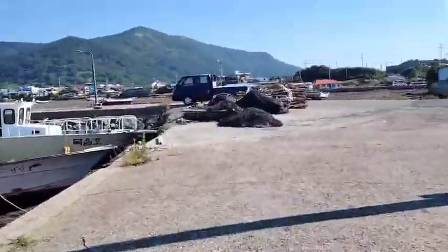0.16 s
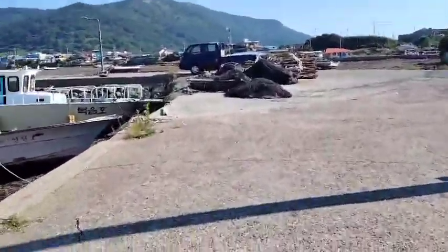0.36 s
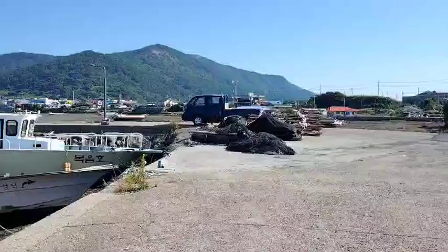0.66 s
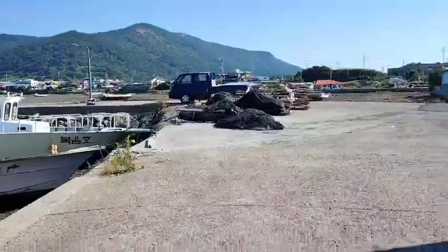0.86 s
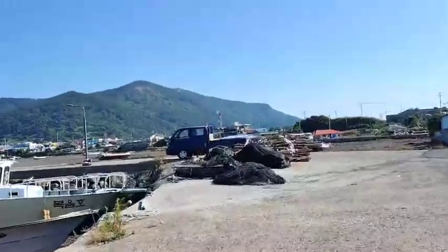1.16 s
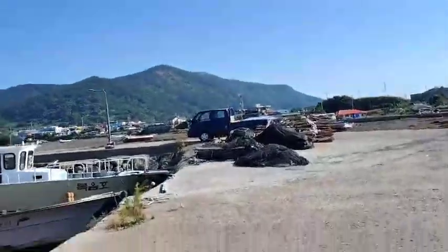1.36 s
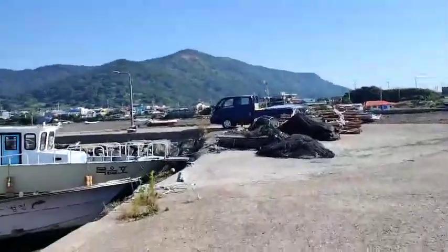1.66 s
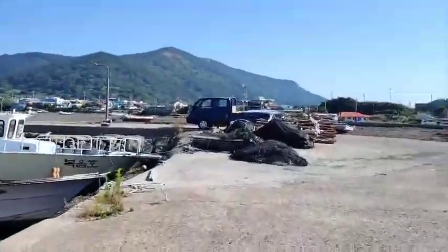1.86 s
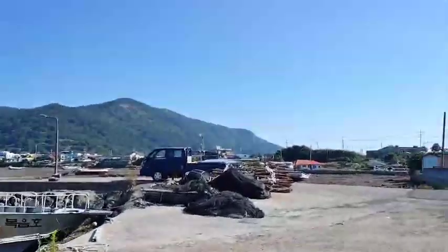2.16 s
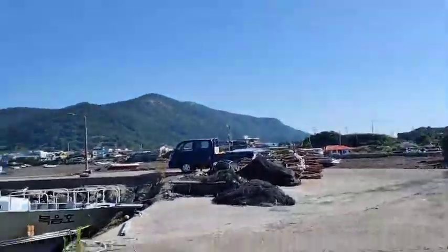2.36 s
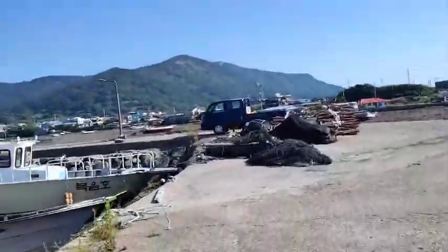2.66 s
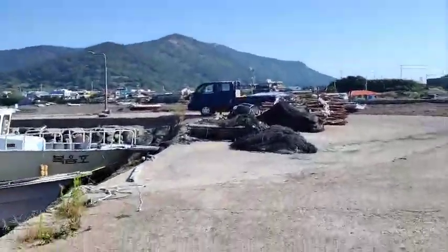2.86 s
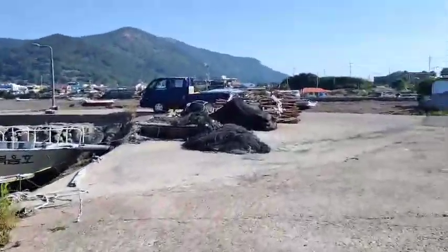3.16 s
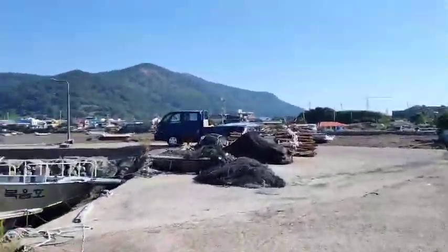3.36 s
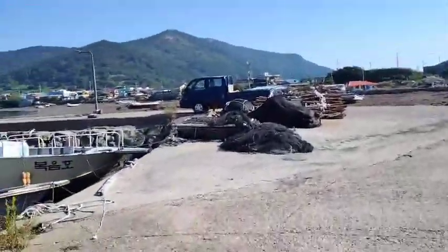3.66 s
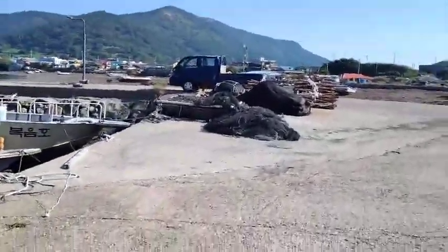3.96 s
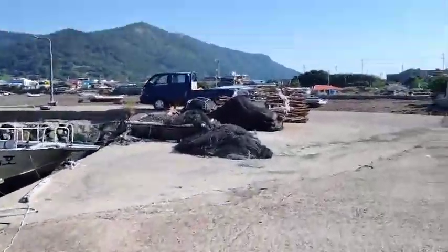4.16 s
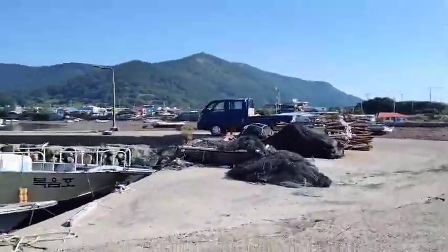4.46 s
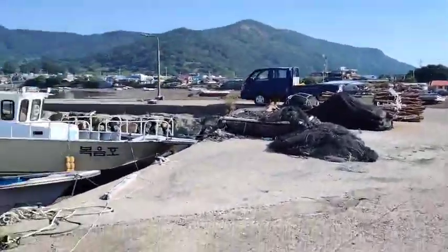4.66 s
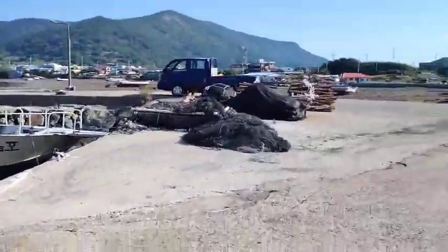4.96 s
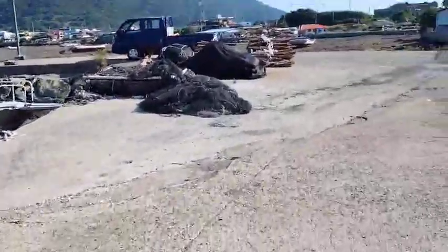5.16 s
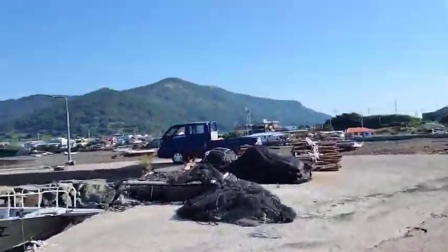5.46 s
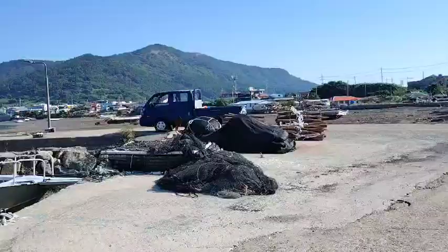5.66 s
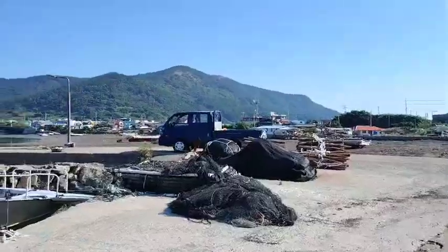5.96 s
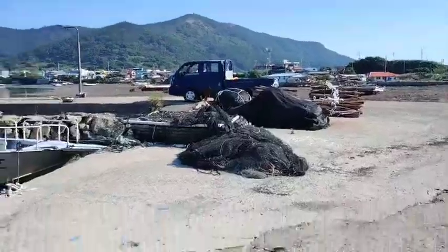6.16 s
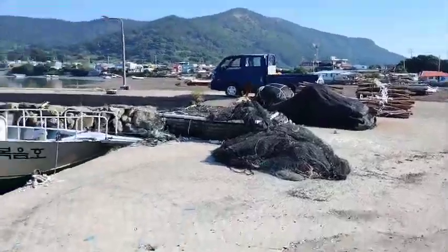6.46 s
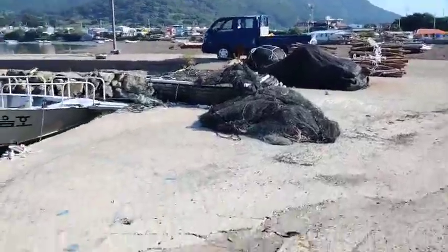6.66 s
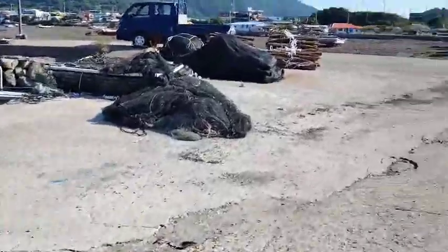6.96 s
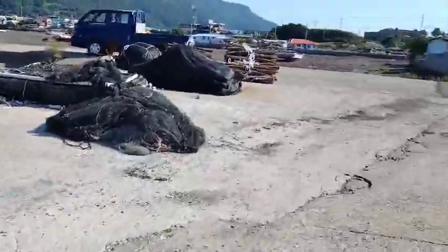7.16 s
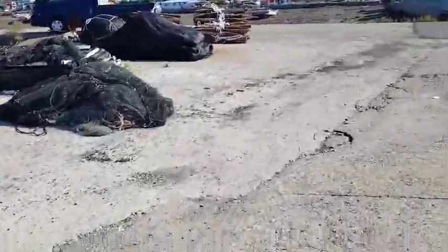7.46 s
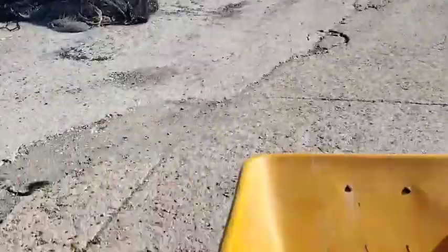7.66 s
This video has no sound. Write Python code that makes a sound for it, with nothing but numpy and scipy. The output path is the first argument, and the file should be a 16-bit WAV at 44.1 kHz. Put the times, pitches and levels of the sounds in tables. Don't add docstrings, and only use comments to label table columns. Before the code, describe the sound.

Close, uneven clatter and low booming rumble of a plastic barrow rolling across bumpy concrete, with stones snapping and metal parts jingling.

```python
import sys
import numpy as np
from scipy import signal
from scipy.fft import rfft, irfft, next_fast_len
from scipy.io import wavfile
from scipy.ndimage import uniform_filter1d, map_coordinates

SR = 44100
rng = np.random.default_rng(int(sys.argv[2]) if len(sys.argv) > 2 else 0)


def bounce(signal):
    frames = np.transpose(np.atleast_2d(signal))
    limited = np.clip(frames, -1, 1)
    pcm = np.round(limited * 32767).astype(np.int16)
    wavfile.write(sys.argv[1], SR, pcm)


def gain_from_decibels(decibels):
    exponent = np.asarray(decibels, float) / 20
    return 10 ** exponent


N = 343980


def unit(x):
    return x / np.sqrt(np.mean(x ** 2) + 1e-20)


def along(points, hz):
    point_hz, value = np.transpose(points)
    return np.interp(np.log(hz + 1), np.log(point_hz + 1), value)


def wobble(rate_hz):
    knots = rng.standard_normal(int(N * rate_hz / SR) + 4)
    return map_coordinates(knots, [np.arange(N) * rate_hz / SR])


def filtered(x, response):
    size = next_fast_len(N + SR // 2)
    hz = np.fft.rfftfreq(size, 1 / SR)
    return irfft(rfft(x, size) * response(hz), size)[..., :N]


def modes(table):
    def response(f):
        total = 0
        for k, (hz, width_hz, level_db) in enumerate(table):
            damping = 1j * f * width_hz
            total = total + (-1) ** k * gain_from_decibels(level_db) * damping / (hz * hz - f * f + damping)
        return total
    return response


def hiss(spectrum, patchy_db=0):
    cells = signal.stft(rng.standard_normal((2, N)), nperseg=256)[2]
    patches = uniform_filter1d(rng.standard_normal(cells.shape[1:]), size=3, axis=0)
    patches = uniform_filter1d(patches, size=6, axis=1)
    pair = signal.istft(cells * gain_from_decibels(patchy_db * unit(patches)), nperseg=256)[1][:, :N]
    return unit(filtered(pair, lambda hz: gain_from_decibels(along(spectrum, hz))))


def onset(t, rise_s):
    return 1 - np.exp(-t / rise_s)


def dying(blows, t60_s, rise_s=0.00076):
    swelling = signal.lfilter([1], [1, -np.exp(-1 / (rise_s * SR))], blows) / (rise_s * SR)
    return signal.lfilter([1], [1, -gain_from_decibels(-60 / (t60_s * SR))], swelling)


def jolts(rate_hz, spread_db):
    size = np.minimum(rng.exponential(1, N), 2)
    return (rng.random(N) < rate_hz / SR) * gain_from_decibels(spread_db * size)


def cluster(t, hz, spread, count, phase_rad, uneven_db=0):
    pitch, turn, size = rng.standard_normal((3, count, 1))
    mode_hz = hz * np.exp(spread * pitch)
    tones = gain_from_decibels(uneven_db * size) * np.sin(2 * np.pi * mode_hz * t + phase_rad * turn)
    return unit(np.sum(tones, 0))


def add_at(track, start_s, sound):
    track[round(start_s * SR):][:len(sound)] += sound


# pitch_hz [Hz], density_db [dB per Hz]
AIR_COLOUR = [(12, -74), (20, -45), (98, 6.5), (176, 11.5), (488, -23), (1710, -29.5), (3770, -47),
              (5500, -40), (7340, -41), (9000, -65), (11700, -94), (19800, -120)]


def air():
    return gain_from_decibels(-35.0) * hiss(AIR_COLOUR)


# start_s [s], length_s [s], from_hz [Hz], to_hz [Hz], level_db [dB]
BRACKET_CHIRPS = [
    (0.53, 0.025, 4300, 5000, -55),
    (1.5, .022, 5000, 6000, -49),
    (0.14, 0.021, 5200, 4200, -48),
]


def chirps():
    out = np.zeros(N)
    for start_s, length_s, from_hz, to_hz, level_db in BRACKET_CHIRPS:
        hz = np.linspace(from_hz, to_hz, round(length_s * SR))
        tone = np.sin(2 * np.pi * np.cumsum(hz) / SR)
        add_at(out, start_s, gain_from_decibels(level_db) * np.hanning(len(hz)) * tone)
    return out


# mid_s [s], length_s [s], level_db [dB]
HIGH_SWELLS = [
    (0.353, 0.055, -77),
    (3.47, 0.17, -60),
    (3.875, .19, -52),
    (4.023, .06, -57),
    (4.49, 0.15, -55),
    (5.08, 0.043, -57.5),
    (5.428, 0.12, -57.5),
    (5.6, 0.077, -56),
    (7.198, 0.05, -57),
    (7.762, 0.071, -58),
]
# pitch_hz [Hz], width_hz [Hz], level_db [dB]
BEARING_MODES = [(11100, 1400, 9), (14300, 3100, 9)]


def axle():
    t = np.arange(N) / SR
    arch, gain = np.ones(N), np.zeros(N)
    for mid_s, length_s, level_db in HIGH_SWELLS:
        u = np.clip(2 * (t - mid_s) / length_s, -1, 1)
        arch = np.minimum(arch, u ** 2)
        gain += gain_from_decibels(level_db) * (1 - u ** 2)
    slip_hz = 1090 * (1 - 0.16 * arch) * (1 + 0.008 * wobble(120))
    cycle = 2 * np.pi * np.cumsum(slip_hz) / SR
    slips = sum(np.cos(k * cycle) * gain_from_decibels(5 * wobble(50)) for k in range(9, 15))
    rub = unit(slips) + 3 * rng.standard_normal((2, N))
    return gain * unit(filtered(rub, lambda hz: modes(BEARING_MODES)(hz) ** 2))


# start_s [s], peak_db [dB]
CLOSE_TICKS = [
    (1.176, -22),
    (3.273, -13),
    (3.433, -21),
    (7.6003, -24.5),
    (7.688, -17.5),
]


def ticks():
    blows = np.zeros(N)
    for start_s, peak_db in CLOSE_TICKS:
        blows[round(start_s * SR)] = gain_from_decibels(peak_db + 7.5)
    colour = [(1000, -29), (3000, 12.5), (8000, 12.0), (12500, -5), (15500, -4)]
    return dying(blows, t60_s=0.0037) * hiss(colour)


# start_s [s], peak_db [dB], pitch_hz [Hz]
WASHER_JUMPS = [
    (0.353, -17, 5680),
    (4.3545, -24, 6000),
    (4.4736, -25, 5910),
    (5.0335, -22, 5290),
    (5.8207, -17, 6030),
    (5.9734, -22, 5810),
    (6.2407, -24, 5330),
    (6.437, -24, 5480),
    (7.4754, -25, 4940),
]


def jingles():
    out, t = np.zeros(N + SR), np.arange(SR // 8) / SR
    for start_s, peak_db, pitch_hz in WASHER_JUMPS:
        steel = cluster(t, pitch_hz, spread=0.09, count=10, phase_rad=3)
        add_at(out, start_s, gain_from_decibels(peak_db - 4.5 - 60 * t / 0.11) * onset(t, 0.001) * steel)
    return out[:N] * [[1], [0.6]]


# start_s [s], peak_db [dB], top edge over peak edge_db [dB]
STONES = [(0.1894, -34, -29), (0.2244, -35, -37), (0.6514, -42, -29), (1.1187, -18.5, -32),
          (1.6611, -38, -49), (2.2117, -35, -37), (2.2563, -29.5, -35), (2.48, -24.5, -23),
          (2.5795, -36, -24), (2.596, -40, -26), (2.8174, -34.5, -28), (3.0444, -20.5, -35),
          (3.0925, -36, -31), (3.1314, -21.5, -30), (3.1694, -25, -19), (3.4737, -24, -34),
          (3.5354, -32, -27), (4.117, -36, -30), (4.14, -27, -25.5), (4.157, -36, -25), (4.2244, -31, -19),
          (4.2954, -32, -25), (4.3394, -42, -29), (4.356, -20, -29), (4.5034, -35, -17), (4.5241, -29, -18),
          (4.7174, -37, -27), (5.1157, -32, -30), (5.4694, -25, -23), (5.578, -25, -23), (5.6217, -21, -21),
          (5.645, -20, -31), (5.6625, -27, -27), (5.6935, -27, -29), (6.0087, -34, -24), (6.1094, -27, -24),
          (6.2932, -22.5, -27), (6.3045, -28.5, -24), (6.4504, -24, -31), (6.4714, -32, -28),
          (7.4914, -28, -28), (7.5254, -35.5, -18), (7.5364, -36, -23), (7.6226, -33, -29),
          (7.662, -34.5, -14)]
# pitch_hz [Hz], density_db [dB per Hz]
PANEL_COLOUR = [(250, -1.5), (420, 2.5), (519, -8), (636, -0.5), (971, -5.5), (1330, -1.5), (1530, -8.5),
                (1730, -5), (2750, -12), (3780, -19.5), (4200, -18), (5460, -26), (9240, -120)]
# pitch_hz [Hz], density_db [dB per Hz]
METAL_COLOUR = [(1880, -7.5), (3200, -3), (3890, -8), (4600, -1.5), (5500, 2), (6340, -0.5), (7060, 2.5),
                (8220, -3), (9000, -16), (11700, -50), (19800, -120)]
# pitch_hz [Hz], density_db [dB per Hz]
SIZZLE_COLOUR = [(7500, -43), (8800, -1), (11000, 2), (15000, -10.5), (16000, -8.5)]


def pebbles():
    body, edge = np.zeros((2, N))
    t60_s = 0.032
    for start_s, peak_db, edge_db in STONES:
        at = round(start_s * SR)
        body[at] = gain_from_decibels(peak_db - 2)
        edge[at] = gain_from_decibels(peak_db + edge_db + 6)
    grind = hiss(METAL_COLOUR, patchy_db=-4) + 1.3 * hiss(PANEL_COLOUR, patchy_db=2)
    cracks = dying(body, t60_s, rise_s=0.00055) * grind
    return cracks + dying(edge, 0.64 * t60_s, rise_s=0.0004) * hiss(SIZZLE_COLOUR)


# start_s [s], level_db [dB], pitch_hz [Hz]
RIM_BLOWS = [(.012, -29, 1800), (.156, -13, 2004), (.628, -24, 1890), (.701, -16.5, 1900),
             (1.116, -21.5, 1906), (1.426, -21, 1300), (2.495, -23, 1900), (2.668, -19.5, 1500),
             (2.834, -26, 1630), (3.098, -24, 2220), (4.759, -20, 1910), (4.829, -14, 1614),
             (5.312, -23.5, 2326), (5.452, -15, 1980), (5.538, -18, 1880), (6.012, -17.5, 1350),
             (.172, -19, 760), (.2, -21, 820), (7.485, -28, 700), (7.665, -28, 750), (5.828, -21, 560)]


def clonks():
    out, t = np.zeros(N + SR), np.arange(SR // 10) / SR
    for start_s, level_db, pitch_hz in RIM_BLOWS:
        rim = cluster(t, pitch_hz, spread=0.11, count=6, phase_rad=1)
        add_at(out, start_s, gain_from_decibels(level_db - 60 * t / 0.07) * onset(t, 0.0007) * rim)
    return out[:N] * [[1], [0.5]]


# start_s [s], peak_db [dB], panel_hz [Hz], bright_db [dB], sizzle_db [dB]
HARD_SNAPS = [(1.173, -14, 2120, -29, -42), (2.254, -23.5, 2100, -28.5, -39),
              (2.433, -11.5, 2530, -19, -34), (2.755, -26, 1050, -18, -21), (2.834, -21.5, 1620, -44, -40),
              (2.887, -12.5, 2180, -27.5, -39), (3.27, -7.5, 2355, -31, -44),
              (3.429, -10.5, 2550, -15.5, -27), (3.577, -16, 1260, -25, -48), (3.993, -19, 1160, -24, -32),
              (4.27, -4.5, 1606, -27, -29), (4.677, -17.5, 1410, -23, -58), (4.82, -11.5, 1600, -21.5, -34),
              (5.032, -14, 2034, -17, -45), (5.309, -12.5, 1690, -20, -37), (5.82, -14.5, 1260, -9.5, -20),
              (6.241, -9.5, 1570, -14, -22), (6.438, -14, 1274, -15.5, -32), (6.635, -7.5, 2196, -21, -33),
              (7.409, -24.5, 1460, -19.5, -29), (7.601, -31, 2010, -16, -14),
              (6.338, -24, 1510, -10.5, -19), (1.528, -22.5, 1340, -21, -34),
              (1.764, -26, 1420, -22, -24.5)]
# start_s [s], peak_db [dB], panel_hz [Hz], bright_db [dB]
FRAME_KNOCKS = [(0.064, -20.5, 1720, -24.5), (0.156, -6.5, 1990, -20.5), (0.351, -18, 1245, -15),
                (0.628, -29.5, 1590, -21), (0.701, -15, 1170, -16.5), (0.74, -17.5, 1175, -30),
                (1.073, -24.5, 2350, -15), (1.426, -15.5, 1244, -25.5), (1.645, -25, 1200, -34),
                (3.159, -20.5, 1210, -31), (3.192, -13.5, 1100, -20.5), (3.403, -19, 1030, -20.5),
                (3.704, -19, 1260, -32), (4.054, -22, 1380, -28), (4.395, -20, 1930, -10.5),
                (4.758, -13, 1950, -23.5), (5.121, -20, 1040, -31.5), (5.25, -25.5, 1220, -27),
                (5.449, -13.5, 1930, -20.5), (5.537, -11, 1680, -17), (5.892, -24, 1220, -15),
                (5.972, -20, 1310, -9.5), (6.01, -18.5, 1354, -27.5), (6.549, -11.5, 2480, -19.5),
                (6.705, -13.5, 1360, -21), (7.064, -24.5, 1035, -20.5), (7.37, -46, 1350, -28),
                (7.475, -15.5, 1260, -20), (7.538, -23.5, 1004, -35.5)]
# start_s [s], peak_db [dB], panel_hz [Hz], bright_db [dB]
LONG_SHUDDERS = [(0.821, -18.5, 1770, -40), (1.106, -16.5, 1895, -20), (1.237, -22, 1316, -21.5),
                 (2.186, -22.5, 2280, -29), (2.29, -21, 1440, -22), (2.393, -15, 1484, -18.5),
                 (2.478, -13.5, 2050, -27), (2.581, -26.5, 1100, -13.5), (2.667, -20, 1460, -22.5),
                 (2.961, -28, 1074, -15), (3.021, -18.5, 1480, -27), (3.095, -10, 2155, -24.5),
                 (3.471, -14.5, 1345, -25.5), (3.796, -18, 1480, -20), (4.118, -13.5, 1225, -27.5),
                 (4.182, -9.5, 1374, -23.5), (4.354, -12, 2037, -29.5), (4.477, -13, 1733, -20.5),
                 (4.623, -20.5, 1264, -14), (4.879, -9.5, 1905, -22), (5.371, -21.5, 1050, -24),
                 (5.621, -11.5, 1140, -31.5), (6.066, -14.5, 1050, -21.5), (6.292, -15, 1100, -21),
                 (6.527, -11.5, 1430, -22), (6.78, -26, 990, -15), (4.518, -17.5, 1470, -28.5),
                 (7.624, -17, 1214, -20), (7.686, -28, 1100, -24)]
# start_s [s], bright_peak_db [dB], panel_hz [Hz], panel over bright over_db [dB]
LIGHT_TAPS = [(0.406, -49.5, 929, 11), (0.43, -56, 1100, 30), (0.772, -35, 1100, 11),
              (1.336, -35, 1670, 11), (1.7065, -38.5, 1150, -13), (1.852, -42.5, 1210, 18.5),
              (2.211, -35, 2140, 15), (2.303, -31.5, 2020, 14), (2.448, -44, 1110, 21.5),
              (2.492, -18, 970, 7), (2.538, -38, 1020, 8.5), (2.596, -28.5, 1900, 6),
              (2.6926, -30, 1650, 3.5), (2.7287, -31.5, 1120, 3), (2.749, -24.5, 1020, 5.5),
              (2.9816, -39.5, 1090, 16.5), (3.039, -26.5, 1320, 13), (3.3123, -27.5, 1140, 9),
              (3.34, -26.5, 1270, 9.5), (3.718, -31.5, 1070, -4), (3.8683, -24.5, 1080, -2),
              (4.153, -24, 1270, 5), (4.201, -22, 2010, 0), (4.221, -30.5, 1040, 12.5),
              (4.2537, -26, 1990, 10.5), (4.2924, -52, 1010, 9), (4.3226, -29.5, 925, 7.5),
              (4.67, -32.5, 2170, 16), (4.6847, -29, 1410, 3.5), (4.7473, -34, 1820, -4),
              (4.782, -27, 1330, -2), (4.8474, -34, 1580, 18.5), (4.947, -30.5, 1760, 14),
              (4.988, -29.5, 1920, 10), (5.2071, -35, 1390, 1), (5.3946, -33, 1090, 9),
              (5.6426, -44, 1100, 4), (5.6603, -35.5, 1740, 18.5), (5.6915, -40, 1340, 7),
              (5.709, -56, 939, -9), (5.9205, -34.5, 1090, 18), (5.9566, -33, 1240, 4),
              (6.1074, -38.5, 1360, 7), (6.1529, -56, 1670, 14), (6.5031, -33, 990, -3),
              (6.8013, -36, 1100, 17), (7.1307, -40.5, 1440, 16), (7.662, -36.5, 1130, 14.5)]


def contacts_of_frame():
    contacts = [(*row, 0.11, 0.00097) for row in HARD_SNAPS]
    contacts += [(*row, row[-1] - 12, 0.15, 0.0012) for row in FRAME_KNOCKS]
    contacts += [(*row, row[-1] - 12.5, 0.19, 0.0039) for row in LONG_SHUDDERS]
    for start_s, bright_peak_db, panel_hz, over_db in LIGHT_TAPS:
        bright_db = -14.5 - over_db
        contacts.append((start_s, bright_peak_db + over_db, panel_hz, bright_db, bright_db - 10, 0.081, 0.00095))
    return contacts


# pitch_hz [Hz], width_hz [Hz], level_db [dB]
BOLT_MODES = [(4450, 90, -5), (5150, 45, 3), (5304, 60, 0), (5463, 65, 1), (5680, 120, -2), (7285, 150, -5)]


def knocks():
    ring, clack, bright, edge, jangle = np.zeros((5, N + SR))
    t = np.arange(SR // 5) / SR
    rebounds = np.pad(np.clip(wobble(200), -2, 1.2), (0, SR))
    for start_s, peak_db, panel_hz, bright_db, sizzle_db, t60_s, rise_s in contacts_of_frame():
        at, life_s = round(start_s * SR), np.clip(t60_s, 0.02, 0.3)
        clear_db = 4 * np.log2(panel_hz / 1500)
        swell = onset(t, rise_s)
        panel = cluster(t, panel_hz, spread=0.12, count=5, phase_rad=3, uneven_db=3)
        panel_db = peak_db + clear_db - 10 - 60 * t / (0.55 * life_s)
        add_at(ring, start_s, gain_from_decibels(panel_db) * swell * panel)
        fall = gain_from_decibels(-60 * (t / life_s) ** 1.27) * swell
        add_at(clack, start_s, gain_from_decibels(peak_db - clear_db - 8.5) * fall)
        bounce_db = 2.5 * rebounds[at:][:len(t)] * (1.5 - np.exp(-t / 0.036))
        crack = gain_from_decibels(4.5 - 60 * t / 0.034) * swell
        rough_fall = fall * gain_from_decibels(bounce_db) + crack
        add_at(bright, start_s, gain_from_decibels(peak_db + bright_db + 0.5) * rough_fall)
        add_at(edge, start_s, gain_from_decibels(peak_db + sizzle_db - 9.0) * rough_fall)
        jangle[at] = gain_from_decibels(peak_db + bright_db - 19)
    rattle = bright[:N] * hiss(METAL_COLOUR, patchy_db=3.5) + edge[:N] * hiss(SIZZLE_COLOUR, patchy_db=2.5)
    bolt_tone = 3 * unit(filtered(rng.standard_normal((2, N)), modes(BOLT_MODES)))
    bolts = dying(jangle[:N], t60_s=0.3, rise_s=0.0017) * bolt_tone
    panels = ring[:N] * [[1], [0.6]]
    return panels + clack[:N] * hiss(PANEL_COLOUR, patchy_db=3.0) + rattle + bolts


# start_s [s], peak_db [dB], tub_hz [Hz]
TYRE_BUMPS = [(0.155, -6, 200.6), (0.46, -17.5, 185), (0.627, -28, 130), (0.701, -9.5, 222),
              (0.878, -14.5, 193.7), (1.107, -11, 181), (1.176, -15, 207), (1.355, -12, 153),
              (1.435, -12, 147), (1.646, -22, 124), (1.842, -6, 153.3), (2.186, -14, 153.4),
              (2.306, -16, 141), (2.407, -12.5, 218), (2.457, -11.5, 179.5), (2.574, -17.5, 143),
              (2.686, -7.5, 154), (2.738, -19, 153), (2.944, -16.5, 193), (3.034, -17, 139),
              (3.118, -9.5, 138.6), (3.194, -6, 199.6), (3.342, -15, 129), (3.426, -5.5, 193.6),
              (3.531, -12, 159.5), (3.609, -17.5, 176), (3.724, -6, 153.4), (4.145, -3.5, 153),
              (4.198, -10, 136), (4.278, -13, 201), (4.414, -14.5, 137), (4.757, -9.5, 141),
              (4.895, -15, 148), (5.037, -10.5, 152), (5.112, -10.5, 142), (5.449, -10.5, 202.4),
              (5.563, -16, 169), (5.818, -9.5, 133), (5.885, -11, 110), (5.97, -8, 158),
              (6.163, -15.5, 153), (6.245, -14, 128), (6.294, -13, 202), (6.351, -19, 194),
              (6.444, -9, 141), (6.529, -9.5, 214), (6.609, -8.5, 154), (6.694, -13.5, 237),
              (7.028, -10, 153), (7.373, -11.5, 153), (7.471, -10.5, 133.4), (7.661, -6.5, 173.5)]


def thumps():
    out, t = np.zeros(N + SR), np.arange(SR // 8) / SR
    for start_s, peak_db, tub_hz in TYRE_BUMPS:
        pitch, turn = np.clip(rng.standard_normal((2, 3, 1)), -1.5, 1.5)
        overtone_hz = 1.6 * tub_hz * np.exp(0.2 * pitch)
        overtones = np.sum(np.sin(2 * np.pi * overtone_hz * t + 3 * turn), 0)
        swing = np.sin(2 * np.pi * tub_hz * t) + 0.2 * overtones * gain_from_decibels(-60 * t / 0.25)
        add_at(out, start_s, gain_from_decibels(peak_db + 5.0 - 60 * t / 0.11) * swing * onset(t, 0.011))
    return out[:N] * [[1], [0.15]]


# time_s [s], level_db [dB]
GROUND_ROUGHNESS = [(0, -22.5), (.4, -17), (.8, -21), (1.2, -13.5), (1.5, -20), (1.75, -29.5),
                    (2.15, -28.5), (2.45, -20.5), (2.95, -18.5), (3.3, -14.5), (3.8, -19.5), (4.3, -19.5),
                    (4.95, -18.5), (5.65, -16), (6.2, -17.5), (6.7, -15.5), (7.1, -22), (7.8, -29)]
# quietest_s (or roughest) [s], settling_s [s], return_s
# [s], depth_db [dB]
SMOOTH_PATCHES = [(.03, 0.0099, 0.041, 6), (.31, 0.051, 0.054, 12.5), (0.535, 0.12, 0.11, 32.5),
                  (0.99, 0.13, 0.12, 47), (1.31, 0.2, 0.042, 14), (2.38, 0.032, 0.023, 17),
                  (3.68, 0.14, 0.13, 17), (4.09, 0.19, 0.014, 10.5), (4.6, 0.03, 0.019, 8.5),
                  (5.28, 0.28, 0.067, 12), (5.41, 0.13, 0.028, 9), (5.77, 0.036, 0.028, 13.5),
                  (6.9, 0.13, 0.1, 10.5), (6.97, 0.11, 0.2, 10.5), (7.31, 0.15, 0.063, 15),
                  (7.453, 0.093, 0.041, 10.5), (7.58, 0.29, 0.085, -3.5)]


def shaking_db():
    t, bumps = np.arange(N) / SR, np.zeros(N)
    ground_db = np.interp(t, *np.transpose(GROUND_ROUGHNESS))
    for quietest_s, settling_s, return_s, depth_db in SMOOTH_PATCHES:
        times_s = [quietest_s - settling_s, quietest_s, quietest_s + return_s]
        ground_db -= np.interp(t, times_s, [0, depth_db, 0])
    for start_s, peak_db, _ in TYRE_BUMPS:
        bumps[round(start_s * SR)] = gain_from_decibels(peak_db - 14)
    return 20 * np.log10(gain_from_decibels(ground_db) + dying(bumps, t60_s=0.59, rise_s=0.0028))


def clatter(rate_hz):
    when, pitch, size, side = rng.random((int(rate_hz * N / SR), 4)).T
    hz = 791 * 2 ** (1.814 * pitch[:, None])
    k = np.arange(SR // 80)
    cycles = hz * k / SR
    fall = gain_from_decibels(-60 * cycles / 26) * (1 - np.exp(-k / 30))
    rings = gain_from_decibels(12 * size[:, None]) * np.sin(2 * np.pi * cycles) * fall
    at = ((when * N).astype(int)[:, None] + k).ravel()
    direct = np.bincount(at, rings.ravel(), N + SR)[:N]
    scattered = np.bincount(at, (rings * np.sign(side - 0.5)[:, None]).ravel(), N + SR)[:N]
    return unit(np.array([direct, scattered]))


# pitch_hz [Hz], width_hz [Hz], level_db [dB]
TUB_MODES = [(96.6, 14.8, -7.5), (126, 32.8, -5), (153, 13.3, 1.5), (185.4, 15.2, -2.5), (203.1, 16.6, 0.5),
             (248.3, 45.4, -6.5), (300, 26.7, -8.5), (352, 43, -12), (394, 33, -16), (466, 230, -25.5),
             (661, 19, -18)]


def rolling():
    boom_db = shaking_db()
    over_mean_db = boom_db + 20
    chatter_db = -35.5 + 0.89 * over_mean_db
    grit_db = -55.5 + 0.68 * over_mean_db
    road = rng.standard_normal((2, N)) * gain_from_decibels(2.33 * wobble(18))
    tub = filtered(road, lambda hz: modes(TUB_MODES)(hz) / (1 + 1j * hz / 1500) ** 3)
    boom = gain_from_decibels(boom_db - 3.5) * unit(tub)
    contacts = jolts(rate_hz=90, spread_db=4)
    contact_swell = unit(dying(contacts, t60_s=0.047, rise_s=0.0016))
    chatter = unit(hiss(PANEL_COLOUR, patchy_db=4.5) * (0.99 + contact_swell))
    rings = clatter(rate_hz=900)
    grains = jolts(rate_hz=110, spread_db=4)
    shaking = unit(dying(contacts + grains, t60_s=0.021, rise_s=0.0053))
    grit = unit(hiss(METAL_COLOUR, patchy_db=4.5) * (0.42 + shaking))
    sizzle = hiss(SIZZLE_COLOUR) * shaking ** 0.88 * gain_from_decibels(1.43 * grit_db + 8.0)
    walls = gain_from_decibels(chatter_db - 1.33) * chatter + gain_from_decibels(chatter_db - 7) * rings
    return boom + walls + (gain_from_decibels(grit_db + 5) + gain_from_decibels(-69.0)) * grit + sizzle


# pitch_hz [Hz], likeness [0-1]
PORT_LIKENESS = [(30, .8), (80, .993), (300, .997), (500, .97), (1000, .85), (2000, .3), (3000, .15),
                 (5000, .4), (15000, .3)]
# pitch_hz [Hz], lead_rad [rad]
PORT_LEAD = [(0, 0), (300, -.15), (950, -.8), (1550, -1.6), (5000, 3.3), (8600, 3.4), (8900, 6.4),
             (10300, 6.7), (12400, 13.4), (15900, 12.5)]
# pitch_hz [Hz], lean_db [dB]
PORT_LEAN = [(60, 0), (300, -0.9), (450, 1.2), (740, 0.5), (1220, -2), (2010, -10), (3100, -2.5), (5500, 4),
             (7300, 4.5), (8400, -5.5), (9500, -6), (11500, -3.5), (15000, 4)]


def ports(pair):
    def shares(hz):
        turn = np.arccos(np.clip(along(PORT_LIKENESS, hz), 0, 1)) / 2
        return np.array([np.cos(turn), np.sin(turn)])

    def sides(hz):
        lead_rad = np.interp(hz, *np.transpose(PORT_LEAD))
        left = gain_from_decibels(along(PORT_LEAN, hz) / 2) * np.exp(0.5j * lead_rad)
        return np.array([left, 1 / left])

    direct, scattered = filtered(pair, shares)
    return filtered(np.array([direct + scattered, direct - scattered]), sides)


def scene():
    small_parts = chirps() + axle() + ticks() + jingles() + pebbles()
    return ports(air() + small_parts + clonks() + knocks() + thumps() + rolling())


def low_pass(x):
    return signal.sosfilt(signal.butter(12, 16360, fs=SR, output="sos"), x)


# pitch_hz [Hz], density_db [dB per Hz]
MIC_NOISE = [(8000, -52), (9000, -1), (13000, 3), (15800, 8)]


def record(dry):
    wind_cut = [(20, -24.5), (62, -18), (80, -7.5), (98, -1.0), (300, -1.5)]  # pitch_hz, gain_db
    top = filtered(dry, lambda hz: hz > 8800)
    power = np.abs(uniform_filter1d(np.mean(top ** 2, 0), size=400))
    shut = 0.6 / (1 + power / gain_from_decibels(-61.5) ** 2)
    gated = dry - shut * top + gain_from_decibels(-79) * hiss(MIC_NOISE)
    mix = filtered(gated, lambda hz: gain_from_decibels(along(wind_cut, hz)) * (hz < 15900))
    return low_pass(mix)


dry = scene()
out = record(dry)
bounce(out)
```